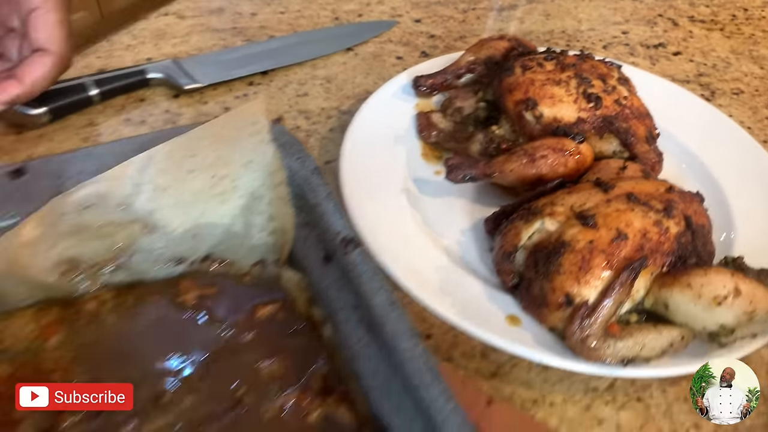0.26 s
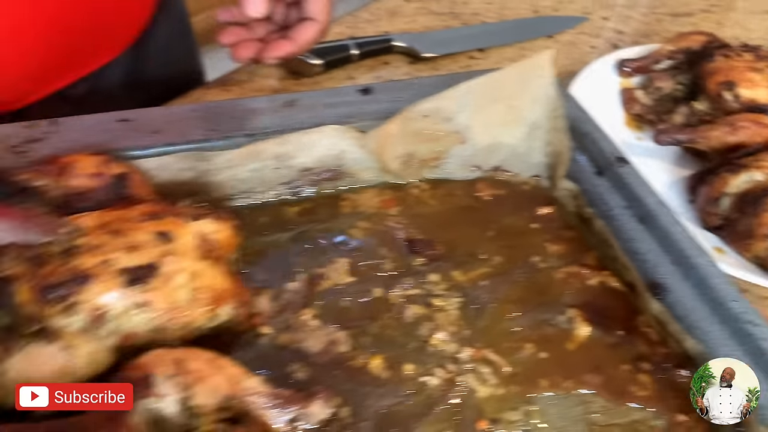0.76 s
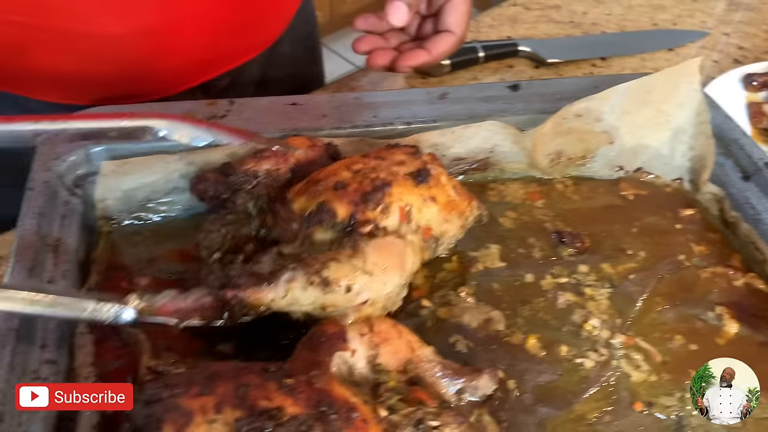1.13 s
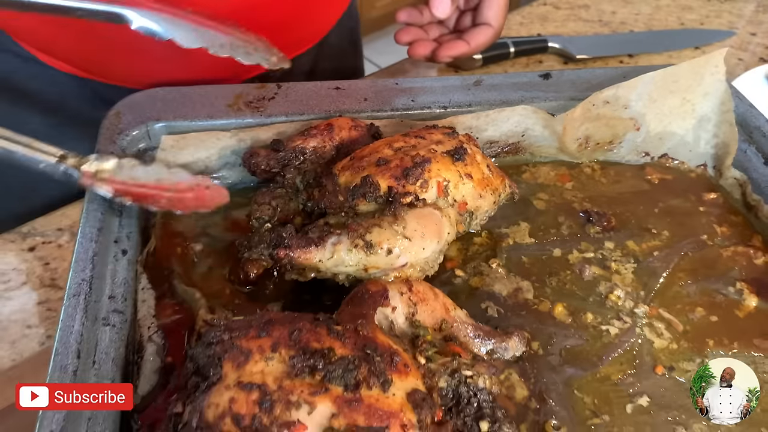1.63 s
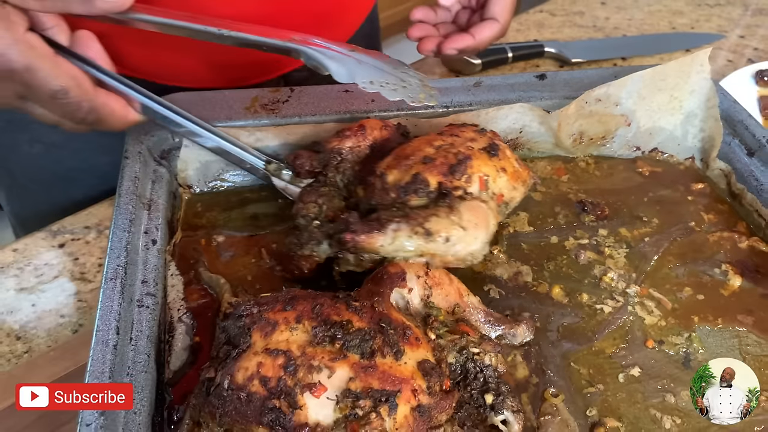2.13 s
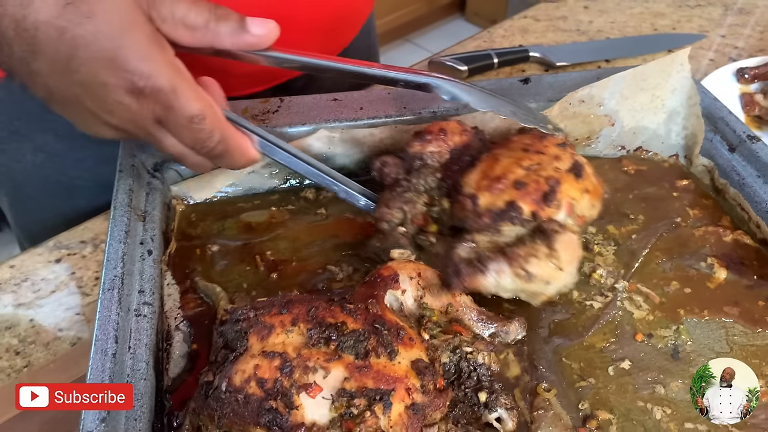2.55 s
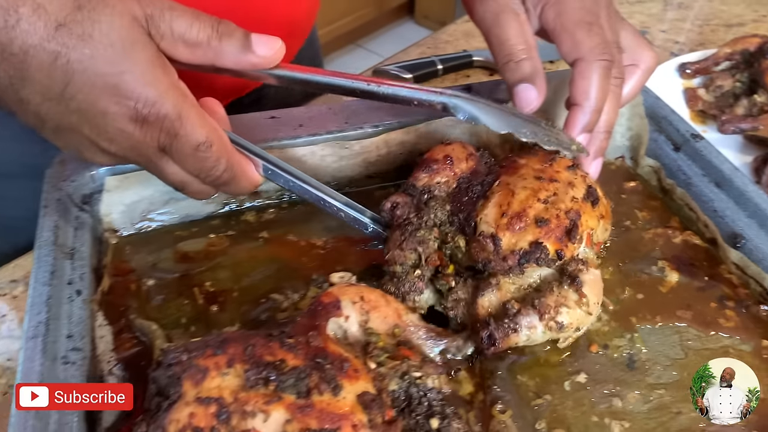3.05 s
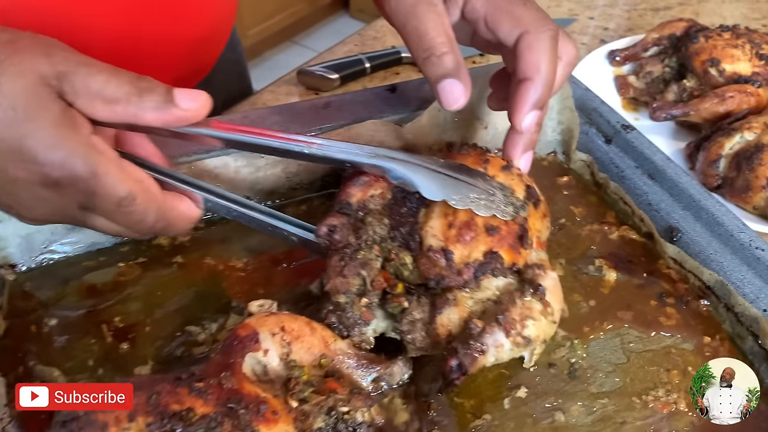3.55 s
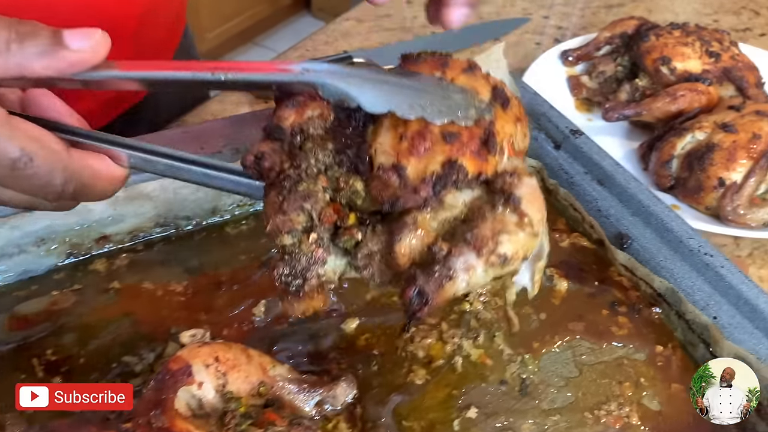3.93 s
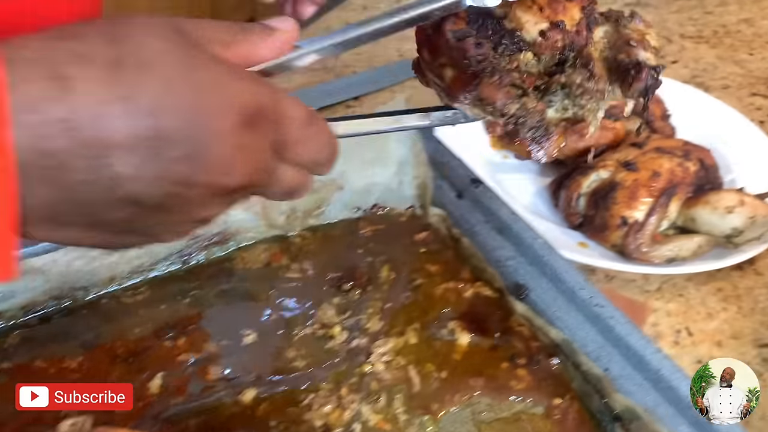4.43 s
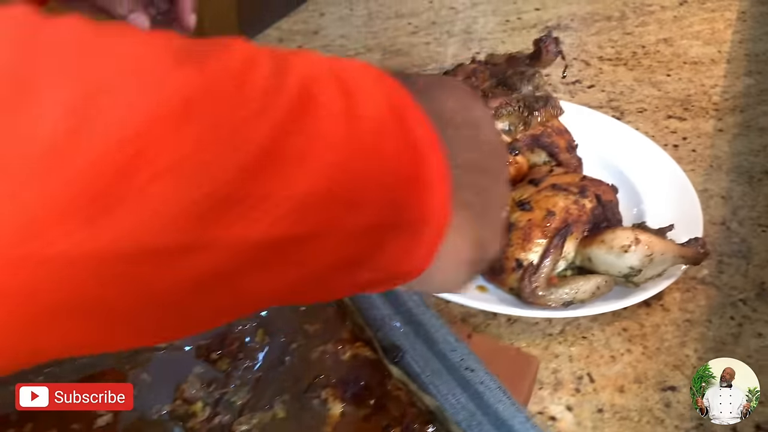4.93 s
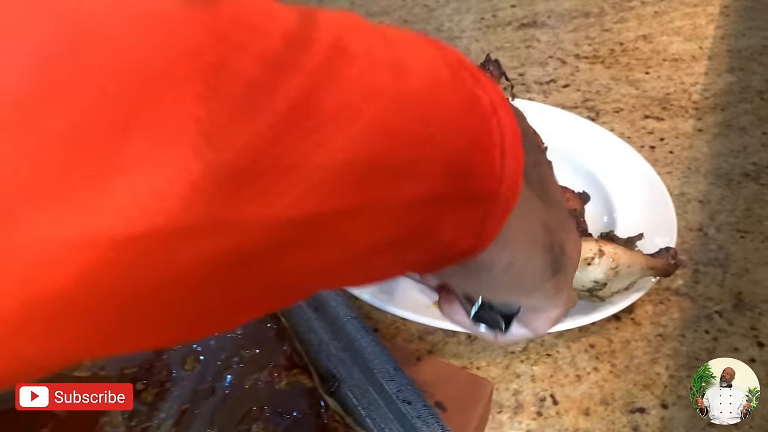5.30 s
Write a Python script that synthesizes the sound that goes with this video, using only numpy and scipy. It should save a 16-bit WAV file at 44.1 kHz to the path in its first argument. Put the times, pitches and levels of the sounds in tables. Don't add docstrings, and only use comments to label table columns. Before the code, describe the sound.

Tongs hit a thin metal pan at about half a second, ringing shortly, and again on its rim before two seconds. Between and after come papery rustles and crisp tiny snaps from roast skin, densest around two and a half seconds. Later sounds are sparse: a hard tick with a dull push, then a small thud and glassy plate ping. Close stereo handheld pickup, short room reflections, low appliance drone.

```python
import sys
import numpy as np
from scipy import signal
from scipy.fft import rfft, irfft, next_fast_len
from scipy.io import wavfile
from scipy.ndimage import map_coordinates

SR = 44100
rng = np.random.default_rng(int(sys.argv[2]) if len(sys.argv) > 2 else 0)


def ratio_of_db(decibels):
    return 10 ** (np.asarray(decibels, float) / 20)


def transcribe(signal):
    frames = np.atleast_2d(signal).T
    limited = np.clip(frames, -1, 1)
    pcm = np.round(limited * 32767).astype(np.int16)
    wavfile.write(sys.argv[1], SR, pcm)


N = 245586

# frequency in Hz, level struck on the base in dB,
# level struck on the rim in dB, ring time t60 in seconds.
PAN_MODES = [(306, -58.5, -12.5, 0.12), (443, -45, -16, 0.047), (499, -2, -3.5, 0.56), (514, -20, -15, 0.6),
             (556.4, -7, -14, 0.5), (642, -11, -14.5, 0.4), (884, -12.5, -22.5, 0.64), (985, 6, 0, 0.06),
             (1078, 0.5, -17.5, 0.5), (1168, -89, -13, 0.38), (1550, -9, -6, 0.48), (1576, 4.5, 0, 0.24),
             (1656, 11.5, 2.5, 0.12), (1720, 13, -31, 0.051), (1765, 9.5, 11, 0.13), (2200, -11, 17, 0.054),
             (2360, -21, -20, 0.11), (2500, 14.5, 9, 0.12), (2800, 3, 17, 0.064), (3025, 4, -19, 0.26),
             (3480, 24, -16, 0.062), (3840, -19, 23.5, 0.056), (4190, -24, 19.5, 0.06),
             (4660, 17, -36, 0.087)]


def at_hz(points, hz):
    curve_hz, value = np.transpose(points)
    return np.interp(np.log(hz), np.log(curve_hz), value)


def shaped(x, gain):
    size = next_fast_len(N)
    hz = np.maximum(np.arange(size // 2 + 1) * SR / size, 1)
    return irfft(rfft(x, size) * gain(hz), size)[..., :N]


def rms_one(x):
    return x / np.sqrt(np.mean(x ** 2) + 1e-20)


def band(x, low_hz, high_hz):
    return signal.sosfilt(signal.butter(2, [low_hz, high_hz], "band", fs=SR, output="sos"), x)


def ring(x, hz, t60):
    decay = ratio_of_db(-60 / (t60 * SR))
    turn = 2 * np.pi * hz / SR
    return signal.lfilter([0, np.sin(turn)], [1, -2 * decay * np.cos(turn), decay * decay], x)


def add(out, s, sound):
    at = round(s * SR)
    out[:, at:at + sound.shape[1]] += sound[:, :N - at]


def grains(per_s, spread_db):
    happens = rng.random(N) < per_s / SR
    sizes = ratio_of_db(spread_db * np.minimum(rng.exponential(1, N), 4)) * happens
    return signal.lfilter([1], [1, -0.93], sizes) * rng.standard_normal((2, N))


def drift(per_s):
    steps = rng.standard_normal(200)
    return rms_one(map_coordinates(steps, [np.arange(N) / SR * per_s], order=3))


def strokes(rows):
    t, power = np.arange(N) / SR, np.zeros(N)
    for s, swell_s, fade_s, level_db in rows:
        side_s = np.maximum(np.where(t < s, swell_s, fade_s), 0.003)
        away = np.minimum(np.abs(t - s) / side_s, 20)
        power += ratio_of_db(2 * level_db - 20 * away ** 1.57)
    return np.sqrt(power)


def knocks(blows, on_rim, rest_s=1):
    out, t = np.zeros((2, N)), np.arange(SR // 2) / SR
    hz, base_db, rim_db, t60 = np.transpose(PAN_MODES)[:, :, None]
    mode_db = rim_db if on_rim else base_db
    muffled_db = 13 * np.clip((t - rest_s) / 0.003, 0, 1) * (hz > 800)
    for s, high_db, low_db, middle_db, share in blows:
        level_luck, phase_luck = rng.standard_normal((2, len(PAN_MODES), 1))
        upper_db = np.where(hz < 2100, middle_db - 0.5, high_db - 23.5)
        blow_db = np.where(hz < 800, low_db + 6.5, upper_db)
        fade_db = -60 * t / (t60 * max(share, 0.05)) - muffled_db
        modes = ratio_of_db(blow_db + mode_db + 1.47 * level_luck + fade_db)
        modes = modes * (1 - np.exp(-t / 0.0055))
        apart = np.minimum(hz / 1500, 1) * phase_luck
        ports = [(modes * np.sin(2 * np.pi * hz * t + side * apart)).sum(0) for side in (-0.5, 0.5)]
        add(out, s, np.array(ports))
    return out


def pan_knocks():
    # start in seconds, levels of the high, low and middle modes in dB, share of ring time 0-1.
    base_blows = [
        (0.2271, -41, -31.5, -63, 0.18),
        (0.3344, -38, -57, -59, 0.57),
        (0.3644, -31, -54, -54, 0.24),
        (0.5535, -9.5, -27.5, -25.5, 0.2),
        (0.6197, -39, -61.5, -60, 1),
        (0.9843, -40, -56, -44.5, 0.16),
    ]
    rim_blows = [
        (1.6893, -49, -38, -43, 0.25),
        (1.7104, -48, -60, -39.5, 0.43),
        (1.7335, -28, -74, -36, 0.41),
        (1.7541, -52, -54.5, -64, 1),
        (1.8433, -39, -55, -34, 0.34),
        (1.8633, -30, -40, -48, 0.55),
        (1.9336, -57, -55, -42.5, 0.28),
    ]
    hard_blow = [
        (1.8098, -19, -38, -25.5, 0.88),
    ]
    unmuffled = knocks(base_blows, on_rim=False) + knocks(rim_blows, on_rim=True)
    return unmuffled + knocks(hard_blow, on_rim=True, rest_s=0.021)


def shimmers():
    # start in seconds, level in dB, centre in Hz, spread in octaves, t60 in seconds.
    bursts = [(0.224, -39, 2200, 1.04, 0.12), (0.555, -41.5, 2200, 1.5, 0.37),
              (1.811, -31.5, 3550, 1.37, 0.18), (2.138, -41, 7950, 1.2, 0.053),
              (2.516, -43.5, 1260, 0.45, 0.064), (2.561, -44, 9000, 1, 0.15),
              (2.652, -39, 5100, 1.03, 0.17), (3.509, -37.5, 4720, 0.56, 0.073),
              (3.472, -54.5, 580, 0.99, 0.34), (3.631, -53, 1170, 0.28, 0.14),
              (5.096, -40.5, 5670, 1.24, 0.2), (5.112, -49.5, 490, 1.6, 0.063),
              (5.275, -43.5, 6540, .7, 0.092), (5.301, -36, 7350, 0.87, 0.27)]
    out, t = np.zeros((2, N)), np.arange(SR // 3) / SR
    hz = np.maximum(np.arange(len(t) // 2 + 1) * SR / len(t), 1)
    for s, level_db, centre_hz, octaves, t60 in bursts:
        peaks_db = 4.5 * np.interp(hz / 45, np.arange(500), rng.standard_normal(500))
        hump_db = -5 * (np.log2(hz / centre_hz) / octaves) ** 2
        noise = irfft(rfft(rng.standard_normal((2, len(t)))) * ratio_of_db(hump_db + peaks_db), len(t))
        envelope = ratio_of_db(level_db + 5 - 60 * t / t60) * (1 - np.exp(-t / 0.00033))
        add(out, s, envelope * rms_one(noise))
    return out


def drag():
    # most pressure in seconds, swell in seconds, fade in seconds, level in dB.
    rubs = [
        (0.37, 0.1, 0.025, -52),
        (0.553, .008, 0.0084, -43.5),
        (0.585, 0.0091, 0.073, -48),
        (1.736, 0.04, 0.013, -52.5),
        (1.845, 0.0088, 0.082, -46.5),
        (1.95, 0.058, 0.28, -59.5),
    ]
    slips = grains(per_s=550, spread_db=4.0)
    body = np.zeros((2, N))
    for hz, base_db, rim_db, t60 in PAN_MODES:
        body += ratio_of_db((base_db + rim_db) / 2) * ring(slips, hz, 0.66 * t60)
    return strokes(rubs) * rms_one(body)


def snaps(breaks, ring_db, crack_hz):
    rise_s = 0.0017
    out, t = np.zeros((2, N)), np.arange(SR // 30) / SR
    for s, peak_db, hz, low_db in breaks:
        shared, *own = rng.standard_normal((3, len(t)))
        t60 = 0.006 * ratio_of_db(0.22 * (peak_db + 29))
        shape = np.where(t < rise_s, (t / rise_s) ** 3, ratio_of_db(-60 * (t - rise_s) / t60))
        burst = (shared + 0.5 * np.array(own)) * shape
        narrow = band(burst, hz * 0.87, hz * 1.13)
        crack = band(burst, crack_hz, 13600)
        dull = band(burst, 540, 3000)
        narrow, crack, dull = [part / np.abs(part).max() for part in (narrow, crack, dull)]
        mix = ratio_of_db(ring_db) * narrow + 0.93 * crack + ratio_of_db(low_db) * dull
        add(out, s - rise_s / 2, ratio_of_db(peak_db) * mix)
    return out


def tip_snaps():
    # time in seconds, peak in dB, ring in Hz, part under 3 kHz in dB.
    touches = [(0.1017, -39.5, 3260, -14), (0.225, -27.5, 4000, 7), (0.3576, -32, 2250, -3),
               (0.5527, -18.5, 2740, -26), (1.4228, -40, 4100, -45), (1.703, -40, 5140, -19),
               (1.733, -40, 3620, -24), (1.8116, -20.5, 7800, -5), (3.1085, -39, 3540, -5),
               (3.2945, -43, 3640, -20), (3.5004, -36, 4150, -16), (3.5084, -10, 4680, -15),
               (3.5201, -21, 4080, -8), (3.5917, -39, 5120, -24), (3.603, -33.5, 4580, -22),
               (3.624, -33, 9500, -8), (3.6371, -23, 4540, -12), (3.6454, -24.5, 4300, -8),
               (5.042, -44.5, 2470, 4.5), (5.094, -21.5, 6400, -18), (5.1133, -19, 11700, -30),
               (5.1203, -31, 10000, -7), (5.2738, -25.5, 7450, -24), (5.298, -10, 9940, -34)]
    return snaps(touches, ring_db=-3.5, crack_hz=2960)


def roll_snaps():
    # time in seconds, peak in dB, ring in Hz, part under 3 kHz in dB.
    tears = [(0.858, -34.5, 4900, -4), (0.8754, -28.5, 13700, -10), (0.8934, -23.5, 5330, -11.5),
             (0.9117, -29, 5600, -20), (0.931, -27, 9500, -28), (0.942, -34, 12000, -29),
             (0.9597, -30, 9000, -32), (0.973, -41, 8300, -17), (0.9829, -19, 10750, -16),
             (0.9976, -37, 3480, -14), (1.0073, -24, 9200, -10.5), (1.025, -23.5, 12400, -19),
             (1.0555, -29, 9750, -7), (1.0619, -31, 8600, -5), (1.0829, -25, 12700, -20),
             (1.1074, -29, 4130, -9), (1.1446, -36, 9500, -29), (1.1486, -30, 12700, -39),
             (1.1598, -31.5, 10350, -9), (1.171, -33, 12800, -8)]
    return snaps(tears, ring_db=-5, crack_hz=5000)


def grip_snaps():
    # time in seconds, peak in dB, ring in Hz, part under 3 kHz in dB.
    crust_breaks = [(1.9997, -34, 8900, -1), (2.0686, -29.5, 4930, -9), (2.0783, -28.5, 10500, -7),
                    (2.134, -19, 9800, -43), (2.1423, -25.5, 10500, -8), (2.2283, -25.5, 4660, -8.5),
                    (2.359, -32, 9100, -9.5), (2.4014, -38.5, 8500, -3), (2.4354, -42, 10500, -5),
                    (2.4836, -33, 10300, -4), (2.4961, -29, 4900, -16), (2.511, -24, 9500, -20),
                    (2.5255, -20.5, 10800, -24), (2.5608, -15, 11600, -27), (2.6024, -24, 12700, -30),
                    (2.6145, -20.5, 9820, -30), (2.648, -13, 9800, -13), (2.6529, -11, 5500, -12.5),
                    (2.6634, -33.5, 4000, -3), (2.6978, -23, 5150, -17), (2.7083, -24, 5200, -18)]
    return snaps(crust_breaks, ring_db=-4.5, crack_hz=3780)


def rustle():
    # most pressure in seconds, swell in seconds, fade in seconds, level in dB, treble tilt in dB.
    rubs = [(0.03, 0.025, .07, -53, -7.5), (0.358, 0.065, 0.037, -51.5, -7),
            (0.554, 0.0052, 0.013, -35.5, -5), (0.608, 0.017, 0.055, -55, -0.5),
            (0.992, .16, 0.12, -44, -7), (1.729, 0.031, 0.023, -43.5, -18),
            (1.811, 0.0036, 0.014, -37, -2.5), (1.95, 0.14, 0.12, -49.5, -10.5),
            (2.13, 0.17, 0.084, -49, -4), (2.6, 0.16, 0.073, -41, -4.5), (2.42, 0.064, .1, -55, -2.5),
            (3.1, .05, .1, -75, -17), (3.28, 0.15, 0.035, -65, 3), (3.632, 0.1, 0.064, -54, -5.5),
            (3.64, 0.024, 0.016, -43.5, -5.5), (5.04, 0.023, .02, -55, -16), (5.12, 0.026, 0.076, -65, 4.5),
            (5.26, .06, .02, -55, -6), (5.569, 0.061, .02, -49.5, -13)]
    # frequency in Hz, level in dB per Hz.
    colour = [(500, -33), (1200, 11), (2600, 0), (4500, 14), (7000, 6.5), (10000, 2), (13500, -1.5),
              (16000, -34)]
    cracks = grains(per_s=4000, spread_db=2.4)
    fine = rms_one(shaped(cracks, lambda hz: ratio_of_db(at_hz(colour, hz))))
    top = band(fine, 7500, 18000)
    body_gain = strokes([(s, swell_s, fade_s, db - 2.0) for s, swell_s, fade_s, db, _ in rubs])
    dry_gain = strokes([(s, swell_s, fade_s, db + tilt_db + 11.5) for s, swell_s, fade_s, db, tilt_db in rubs])
    return body_gain * (fine - top) + dry_gain * top


def short_rings(rows):
    out, t = np.zeros((2, N)), np.arange(SR // 2) / SR
    for s, level_db, hz, t60 in rows:
        onset = 1 - np.exp(-t * min(hz, 2000) / 2.0)
        tone = ratio_of_db(level_db - 60 * t / t60) * np.sin(2 * np.pi * hz * t) * onset
        add(out, s, np.tile(tone, (2, 1)))
    return out


def plate_rings():
    # start in seconds, level in dB, frequency in Hz, t60 in seconds.
    touches = [
        (5.299, -29.5, 1880, 0.014),
        (5.299, -33, 2720, 0.048),
        (5.299, -53, 4500, 0.089),
        (5.299, -40, 5800, 0.11),
        (5.299, -14.5, 7400, 0.025),
        (5.298, -20.5, 9880, 0.02),
        (3.51, -21, 6000, 0.014),
        (1.811, -16.5, 8150, 0.032),
        (1.811, -27.5, 7200, .06),
    ]
    return short_rings(touches)


def thuds():
    # start in seconds, level in dB, frequency in Hz, t60 in seconds.
    pushes = [(0, -46.5, 503, 0.54), (.556, -51, 71.5, 0.092), (1.69, -31, 330, 0.039),
              (1.819, -55.5, 62.8, 0.66), (3.478, -35.5, 97, 0.14), (3.476, -36, 211, 0.036),
              (3.511, -42, 199, 0.031), (5.103, -31.5, 93, 0.058), (5.1, -39, 43.4, .2),
              (5.112, -32, 170, 0.099), (5.118, -43, 342, 0.1), (5.115, -45.5, 740, 0.065)]
    return short_rings(pushes)


def kitchen(x):
    # frequency in Hz, t60 in seconds.
    room_t60 = [(300, 0.44), (3000, 0.13), (12000, 0.14)]
    t, white = np.arange(SR // 2) / SR, rng.standard_normal((2, SR // 2))
    tail = np.zeros((2, len(t)))
    for hz in 150 * 2 ** np.arange(7):
        tail += band(white, hz, 2 * hz) * ratio_of_db(-60 * t / at_hz(room_t60, hz * 1.2))
    tail = tail * np.clip((t - 0.004) / 0.008, 0, 1)
    tail = tail / np.sqrt((tail ** 2).sum(1, keepdims=True))
    return signal.fftconvolve(x, tail, axes=1)[:, :N]


def air():
    # time in seconds, level in dB.
    rumble = [(0.0, -59.5), (0.34, -76.5), (0.59, -76), (0.79, -67), (1.02, -73), (1.23, -64.5),
              (1.49, -62.5), (1.88, -65.5), (2.17, -72.5), (2.98, -68.5), (3.29, -63.5), (3.71, -65.5),
              (4.06, -61), (4.45, -66.5), (4.96, -63.5), (5.57, -63.5)]
    # most movement, swell and fade in seconds, level in dB.
    shifts = [
        (0.05, 0.28, 0.35, -59.5),
        (0.74, 0.16, 0.31, -58.5),
        (1.3, 0.21, 0.48, -66),
        (1.95, 0.17, 0.24, -55),
        (2.55, 0.16, 0.18, -62.5),
        (2.93, 0.083, 0.069, -63.5),
        (3.14, 0.11, 0.34, -60.5),
        (4.5, 0.16, .3, -65),
        (5.0, 0.13, 0.56, -66),
    ]
    # frequency in Hz, level in dB per Hz.
    colour = [(15, -70), (25, -17.5), (86, -7.5), (124, -13), (155, -10), (730, -21), (805, -22),
              (889, -19), (1290, -21), (1570, -17.5), (2300, -14.5), (3900, -8), (5240, -13.5),
              (9000, -12.5), (11000, -21.5), (13500, -25), (15500, -54)]
    # frequency in Hz, width in Hz, lift in dB.
    room_modes = [(97, 4.7, 9.5), (158, 41, 9), (223.6, 22, 8), (330, 6.2, 10.5), (1556, 45, 6.5)]
    rumble_db = np.interp(np.arange(N) / SR, *np.transpose(rumble))
    swing_db = rumble_db - rumble_db.mean()

    def lift(hz):
        return sum(db / (1 + (2 * (hz - mode_hz) / width) ** 2) for mode_hz, width, db in room_modes)

    noise = shaped(rng.standard_normal((2, N)), lambda hz: ratio_of_db(at_hz(colour, hz) + lift(hz)))
    drone = shaped(noise, lambda hz: 1 / (1 + (hz / 350) ** 4))
    hiss = shaped(noise, lambda hz: 1 / (1 + (1100 / hz) ** 4))
    hiss = hiss + (ratio_of_db(0.8 * drift(per_s=9.0)) - 1) * band(hiss, 2600, 4800)
    murmur = noise - drone - hiss

    murmur_gain = np.hypot(ratio_of_db(-75 + 0.77 * swing_db), strokes(shifts))
    hiss_gain = ratio_of_db(-60.5 + 0.11 * swing_db)

    def wavering(part, gain, waver_db):
        return gain * ratio_of_db(waver_db * drift(per_s=6.4)) * rms_one(part)

    low = wavering(drone, ratio_of_db(rumble_db), waver_db=1.2) + wavering(murmur, murmur_gain, waver_db=1.2)
    return low + wavering(hiss, hiss_gain, waver_db=0.5)


def scene():
    metal = pan_knocks() + shimmers() + drag() + plate_rings() + thuds()
    crisp = tip_snaps() + roll_snaps() + grip_snaps() + rustle()
    room_send = ratio_of_db(-12) * metal + ratio_of_db(-17) * crisp
    return metal + crisp + kitchen(room_send) + air()


def low_pass(x):
    return signal.sosfilt(signal.butter(12, 16790, fs=SR, output="sos"), x)


def record(dry):
    # frequency in Hz, likeness 0-1.
    likeness = [(100, .97), (350, 0.85), (800, 0.25), (2000, 0.08), (7500, 0.05), (9000, 0.26),
                (10500, 0.99), (16000, 1)]
    # frequency in Hz, left minus right in dB.
    balance = [(200, -0.5), (1200, 0), (3500, 2), (5500, -2), (7500, -2), (8500, 0), (10000, -1)]

    def alike(hz):
        return np.clip(at_hz(likeness, hz), 0, 1)

    def delay(hz, samples):
        return np.exp(-2j * np.pi * hz / SR * samples)

    def shared_path(hz):
        return alike(hz) * delay(hz, np.interp(hz, [4500, 5500], [-4.0, 13.05]))

    def own_path(hz):
        return np.sqrt(1 - alike(hz) ** 2) * delay(hz, np.interp(hz, [1860, 2300], [-7.0, 31]))

    right = dry[1]
    left = shaped(right, shared_path) + shaped(dry[0], own_path)
    left = shaped(left, lambda hz: ratio_of_db(at_hz(balance, hz)))
    steep_low_pass = signal.cheby2(10, 60, 16900, fs=SR, output="sos")
    return low_pass(signal.sosfilt(steep_low_pass, [left, right]))


dry = scene()
out = record(dry)
transcribe(out)
```